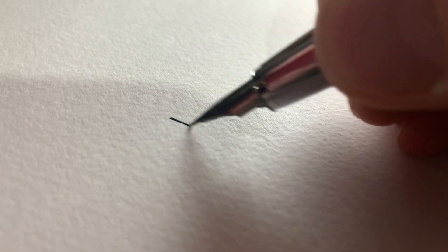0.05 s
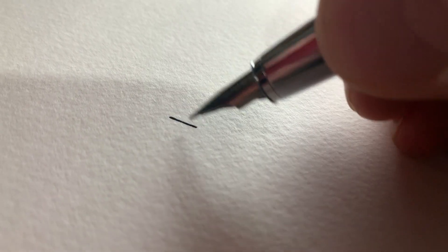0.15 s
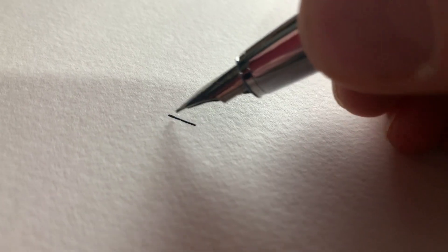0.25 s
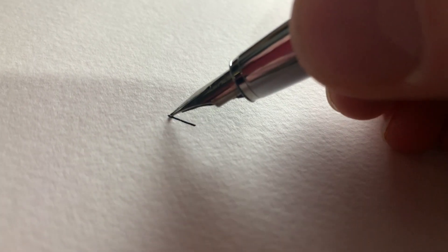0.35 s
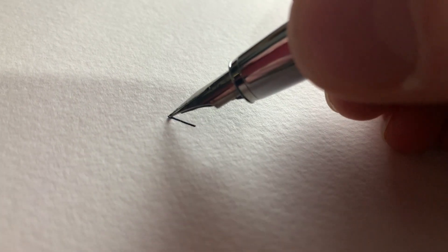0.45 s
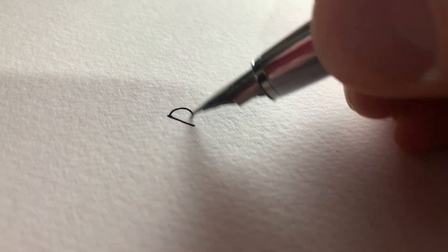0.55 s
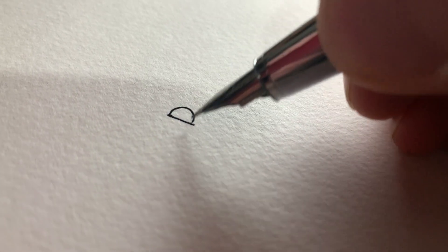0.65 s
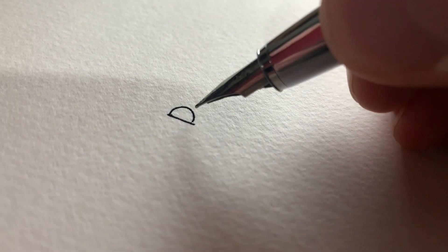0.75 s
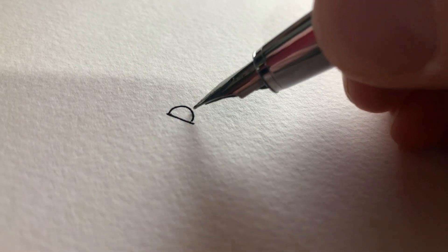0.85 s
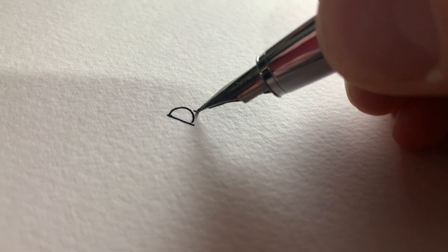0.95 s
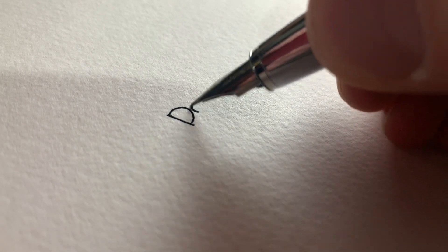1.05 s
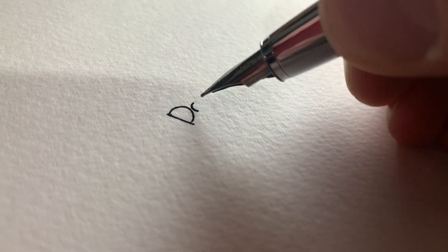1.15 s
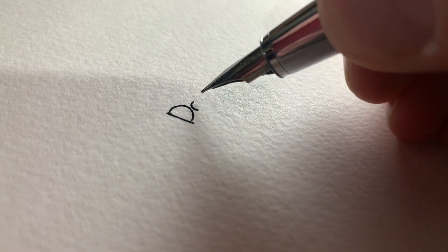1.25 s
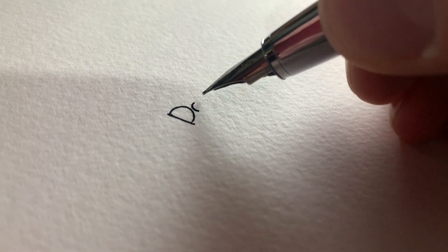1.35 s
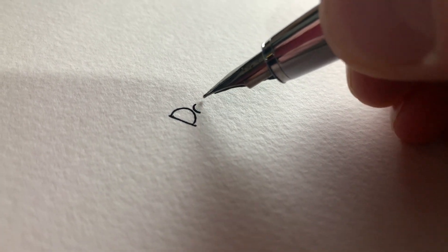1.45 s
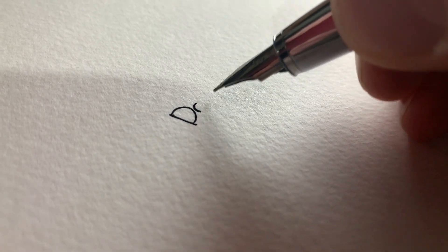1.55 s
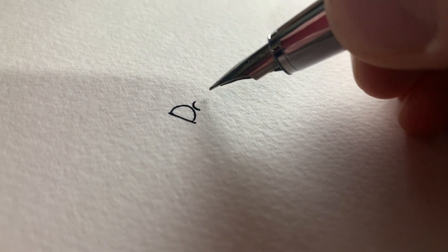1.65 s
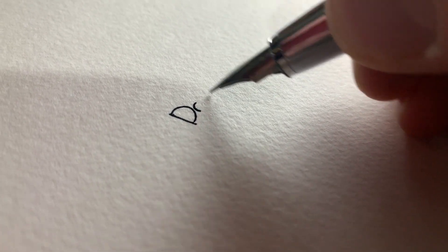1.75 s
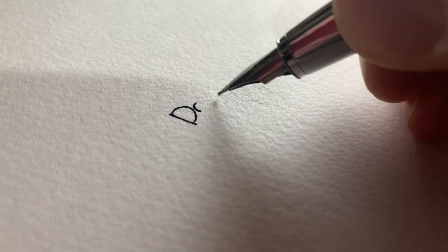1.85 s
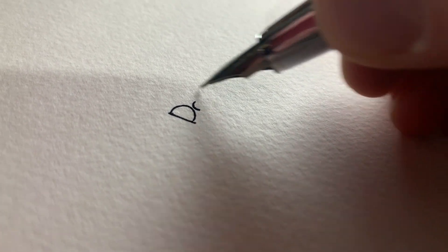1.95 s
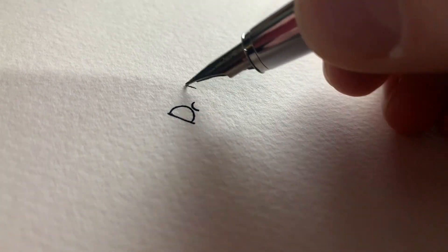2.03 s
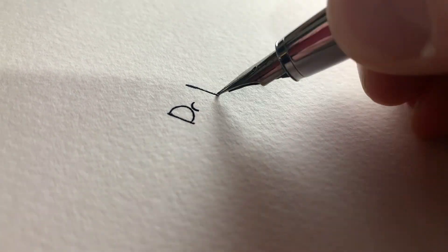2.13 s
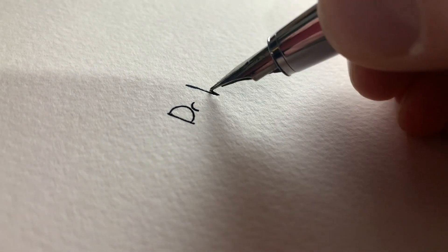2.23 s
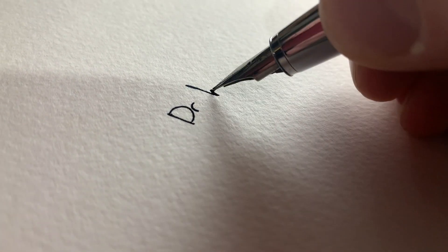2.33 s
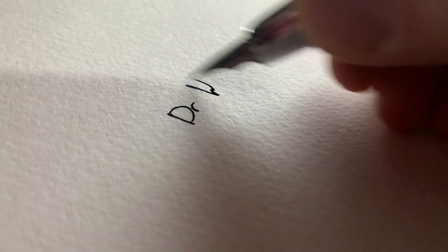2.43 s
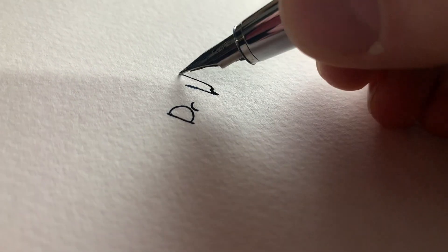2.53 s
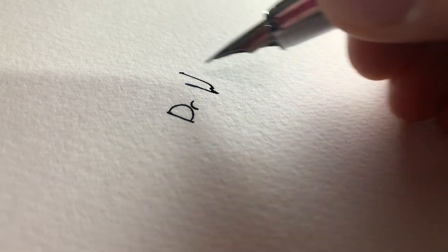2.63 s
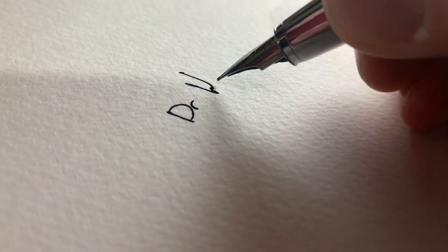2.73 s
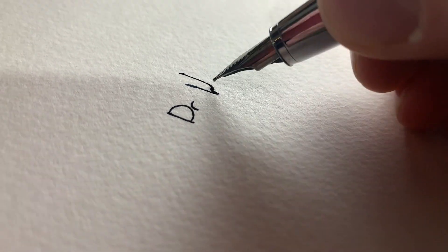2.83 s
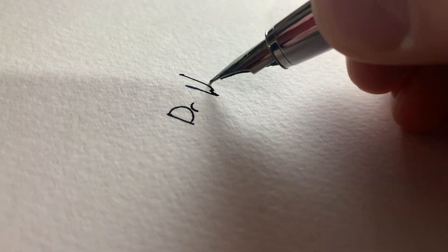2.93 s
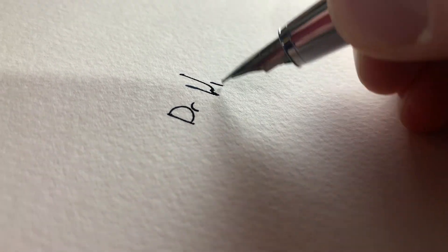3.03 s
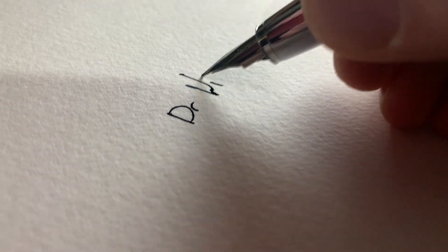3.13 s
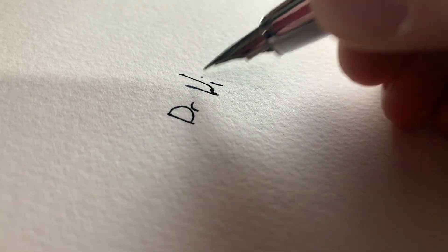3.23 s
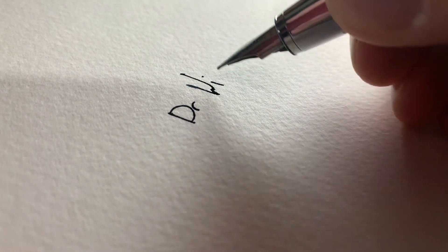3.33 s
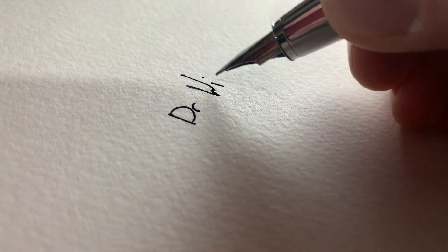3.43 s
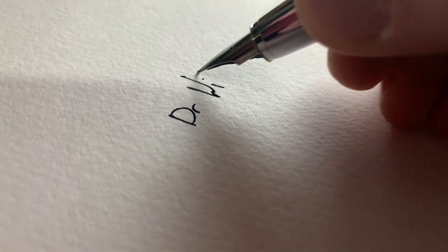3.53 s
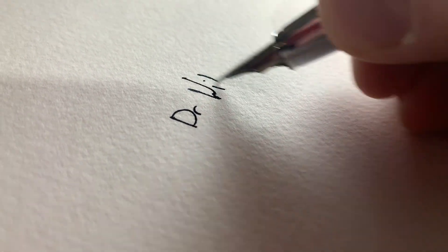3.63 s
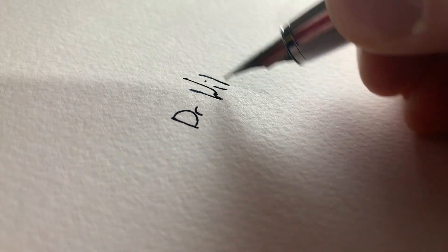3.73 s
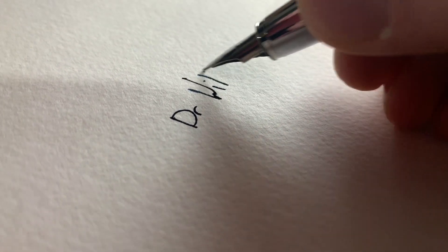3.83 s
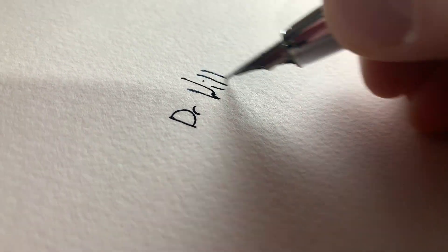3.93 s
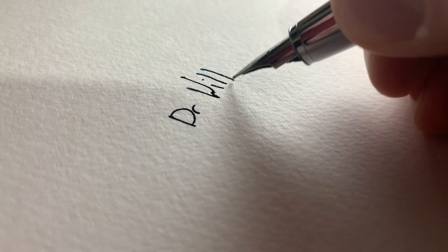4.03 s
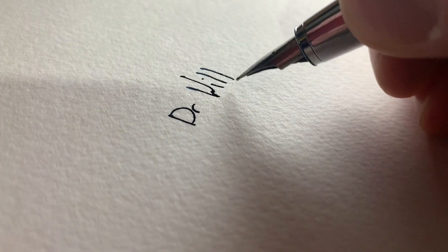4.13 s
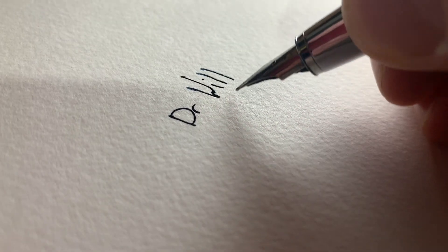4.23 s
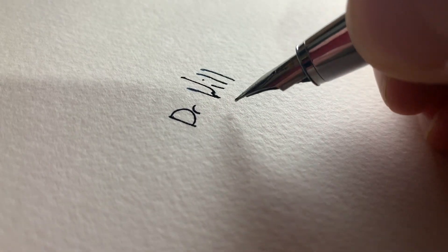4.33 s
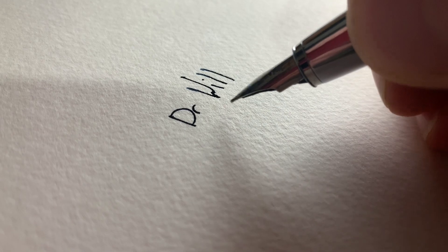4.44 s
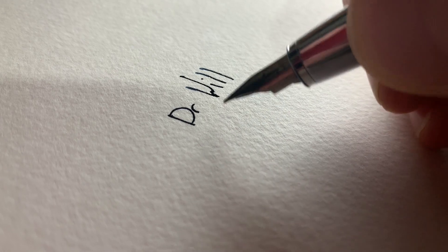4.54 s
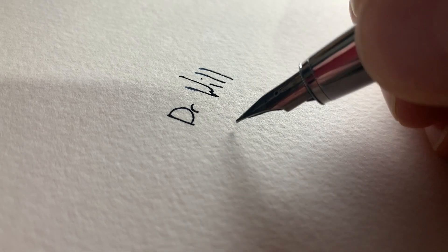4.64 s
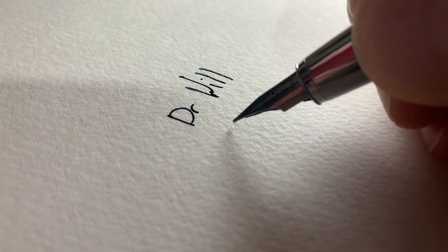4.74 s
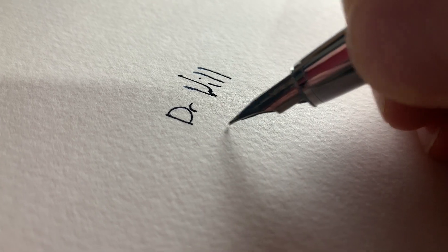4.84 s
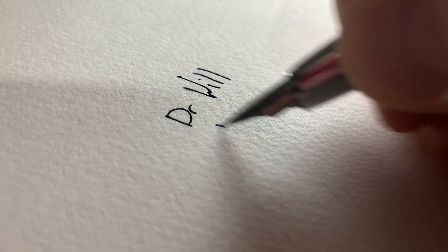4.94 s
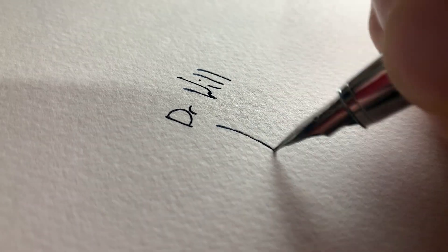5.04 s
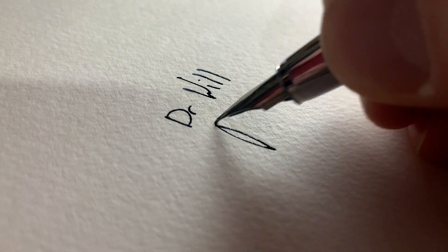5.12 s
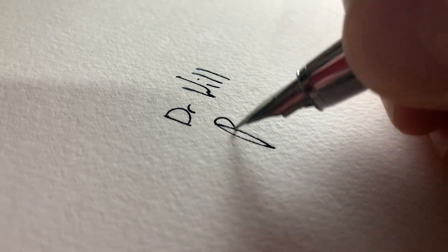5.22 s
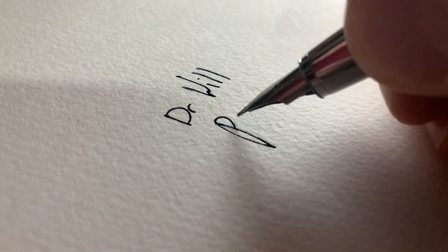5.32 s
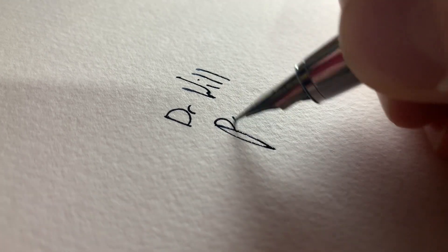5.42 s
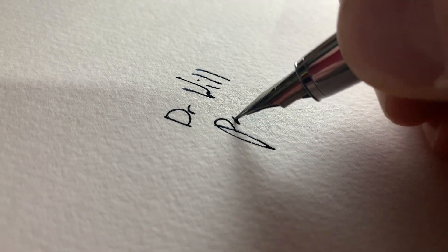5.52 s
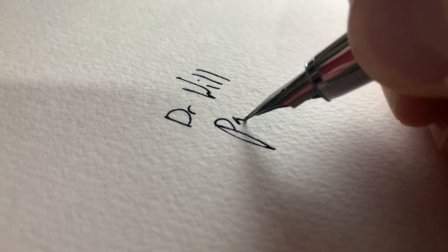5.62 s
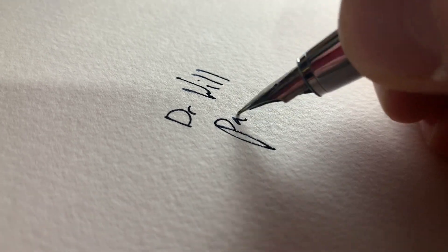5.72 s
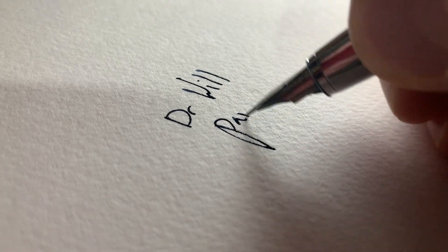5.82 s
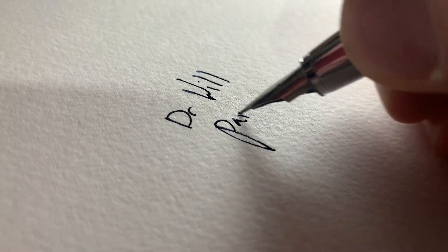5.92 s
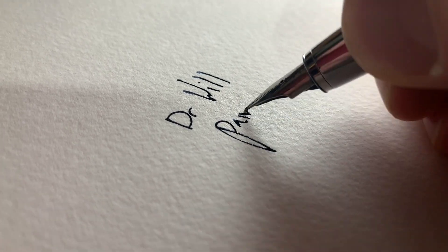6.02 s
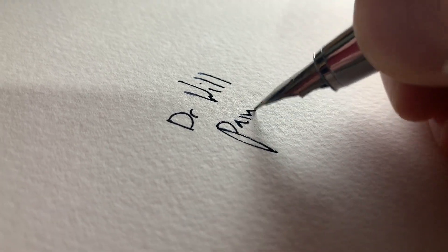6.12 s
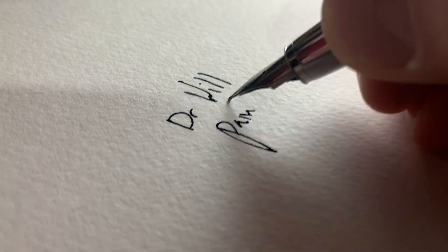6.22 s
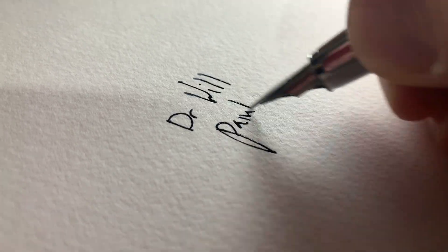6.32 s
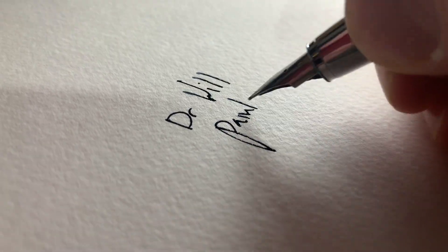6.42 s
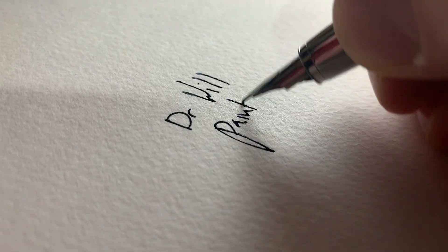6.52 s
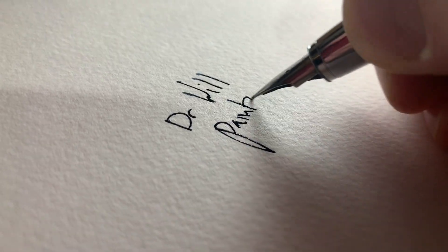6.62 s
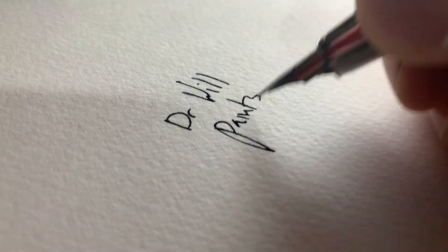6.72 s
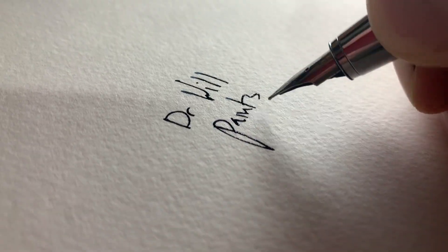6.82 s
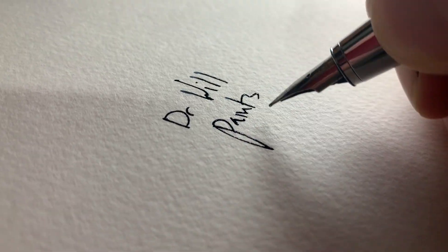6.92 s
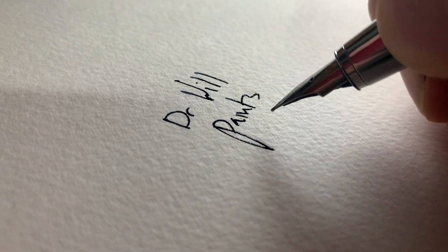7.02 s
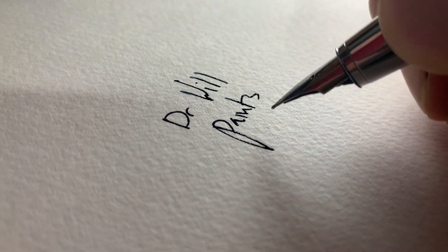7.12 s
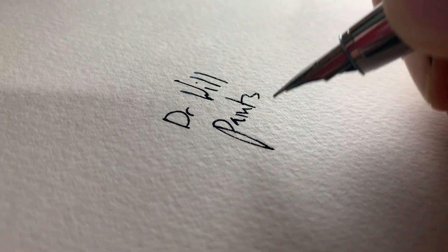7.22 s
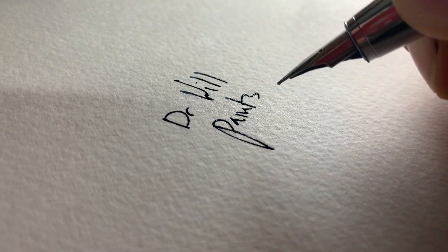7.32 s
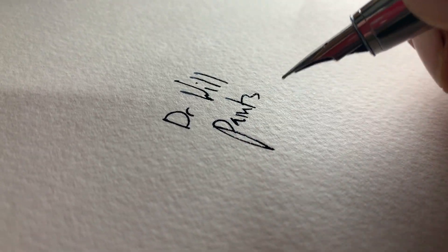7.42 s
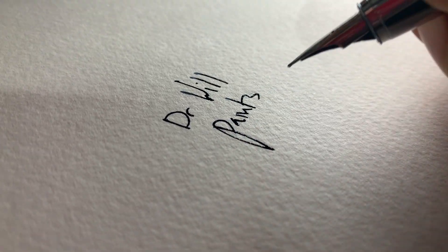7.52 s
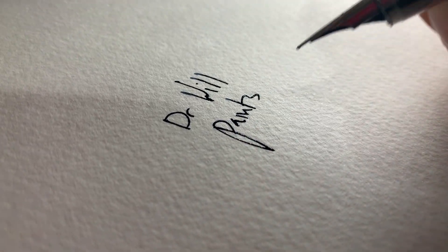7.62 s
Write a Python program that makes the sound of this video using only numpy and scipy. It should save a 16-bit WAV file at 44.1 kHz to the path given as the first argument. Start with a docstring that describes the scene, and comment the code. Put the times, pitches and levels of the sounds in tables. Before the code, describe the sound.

A few words are written with a metal nib, heard close and centred. Each stroke is a brief dry rasp, under a fifth of a second, with a hollow low thump from the desk top. Sharp little taps, soft finger bumps and barely audible skin rustles fall between. Sparse at first, the strokes crowd together after a pause. The room is small and furnished, with a short tail and quiet air noise.

```python
"""Fountain pen on textured paper

A pen writes a few words, close up in a quiet room. In each stroke random slips of the steel nib over the
fibres are filtered into scratch, while the same force drives the desk top modes as a drumming.
Nib contacts add clicks, thuds and a low knock; faint ticks, soft finger bumps and brushing slides of the
hand are scattered around them. Decaying noise makes the short room tail, over rumble, air, hum and whine."""
import sys
import numpy as np
from scipy import signal
from scipy.fft import rfft, irfft
from scipy.io import wavfile
from scipy.ndimage import uniform_filter1d, map_coordinates

SR = 44100
rng = np.random.default_rng(int(sys.argv[2]) if len(sys.argv) > 2 else 0)


def waveform_to_disk(signal):
    """Save audio, clipped to [-1, 1], as 16-bit WAV at the path in sys.argv[1]."""
    frames = np.transpose(np.atleast_2d(signal))
    scaled = np.clip(frames, -1, 1) * 32767
    samples = np.round(scaled).astype(np.int16)
    wavfile.write(sys.argv[1], SR, samples)


N = 338060
TIME = np.arange(N) / SR
FREQ = np.maximum(np.fft.rfftfreq(N, 1 / SR), 1)

# nib strokes: (time [s], nominal length [s], relative scratch level [dB],
#   pull [-1 pushed away .. 1 drawn toward the hand], edge [about -1 nib flat .. 1 on its edge])
NIB_STROKES = [(0.351, 0.082, -50, 0.73, 0.18), (0.83, 0.043, -43.5, -0.32, -0.235),
               (0.856, 0.091, -50, 0.13, -.1), (1.356, 0.092, -54, 0.51, -0.089),
               (2.319, 0.055, -58, -0.38, 0.45), (2.384, 0.092, -47.5, 0.61, -0.12),
               (2.515, 0.0432, -47, -0.28, -0.5), (2.733, 0.08, -41.5, -0.33, -0.44),
               (3.283, 0.086, -54.5, -0.92, 0.3), (3.869, 0.041, -66.5, 0.79, 0.26),
               (3.918, 0.11, -49, 0.28, -0.0042), (4.165, 0.0463, -60, -0.75, 0.49),
               (4.213, 0.11, -47, 0.47, -0.015), (5.194, 0.0694, -58.5, -0.56, 0.1),
               (5.264, 0.099, -42, 0.34, 0.018), (5.39, 0.073, -37.5, -0.75, -0.22),
               (5.453, .1, -47, -0.32, -0.24), (5.76, 0.058, -56.5, -0.25, -0.017),
               (5.848, 0.0487, -57.5, 0.17, -0.67), (5.913, 0.089, -56.5, -0.31, 1),
               (6.071, 0.12, -60.5, -0.39, 0.59), (6.259, 0.08, -54.5, -0.38, 1),
               (6.348, 0.043, -53.5, -0.19, -0.55), (6.407, 0.09, -61.5, -0.22, 0.26),
               (6.606, 0.12, -49.5, 0.183, 0.18), (6.863, .075, -49.5, 0.081, 0.033),
               (6.915, 0.0915, -58, -0.25, -0.69), (6.982, 0.0489, -44.5, -0.84, -0.61),
               (7.012, 0.057, -55.5, 0.64, -1.2)]
# the hand slides on the sheet: (time [s], nominal length [s], level [dB])
HAND_SLIDES = [(0.229, 0.091, -71), (0.486, 0.0504, -70.5), (1.261, 0.058, -70), (1.581, .085, -63.5),
               (1.86, 0.0893, -67.5), (2.092, 0.0692, -66.5), (2.575, 0.044, -64), (2.926, 0.1, -64),
               (3.351, 0.13, -74), (4.604, 0.072, -74.5), (4.886, 0.087, -69), (5.981, 0.093, -70.5),
               (6.501, 0.195, -69.5), (7.078, 0.11, -75)]
# nib contacts, landings and two loud ticks of the lifted pen (at 2.467 and 7.055 s):
#   (time [s], relative level [dB], hardness [0..1])
NIB_CONTACTS = [(0.681, -52, 0.3), (0.8155, -40.5, 0.45), (1.226, -47.5, 0.22), (2.329, -44, 1),
                (2.467, -37.5, 0), (3.246, -49, 0.79), (3.48, -36, 0.74), (3.876, -38, 0.9),
                (4.178, -34, 1), (5.2027, -41, 0.91), (5.718, -45, .7), (6.049, -40, 0.48),
                (6.232, -43.5, 0.12), (6.3452, -54, 0.59), (6.5788, -34.5, 0.75), (7.055, -39, 0.78)]
# faint dry ticks of the lifted pen: (time [s])
TICK_TIMES = [0.262, 0.539, 1.093, 1.92, 2.192, 3.019, 3.579, 3.852, 4.125, 4.401, 4.678, 4.959, 7.156,
              7.432]
# fingers bump the desk softly: (time [s], desk level before softening [dB])
FINGER_BUMPS = [(0.255, -59), (1.442, -36), (1.481, -45), (2.924, -47.5), (3.295, -54), (5.549, -39),
                (6.305, -33), (6.83, -38), (7.316, -56.5)]
# resonances of the desk top: (frequency [Hz], width [Hz], relative level [dB])
DESK_MODES = [(64.4, 45, -13.5), (197.9, 11, -3.5), (229.7, 28.6, 4), (391, 22, -25), (427, 50, -27.5),
              (506.6, 18.6, -21.5), (558, 28.2, -18), (733, 72, -19.5), (967, 101, -25)]
# colour of the scratch on paper: (frequency [Hz], relative level [dB])
PAPER_COLOUR = [(350.0, -9), (650.0, -5.5), (1050.0, -7), (1400.0, -5), (2100.0, -1), (3400.0, -3),
                (4300.0, -1), (5500.0, -5.0), (7000.0, -7.5), (8400.0, -4.5), (9200.0, -13.5),
                (9800.0, -21.5), (10700.0, -11.5), (11700.0, -20)]
# colour of skin brushing the sheet: (frequency [Hz], relative level [dB])
SKIN_COLOUR = [(700, -12), (1600, -10), (2300, -3.5), (4000, -2.5), (4700, -7), (6300, -0.5), (8200, -10),
               (9800, -16.5), (11500, -31)]
# colour of a hard contact with ringing tines: (frequency [Hz], relative level [dB])
HARD_TAP_COLOUR = [(500, -9), (900, -16.5), (1300, 3), (1700, -6), (2150, 17), (2450, -3.5), (2850, 14),
                   (3500, -13.5), (4200, 14.5), (5300, 13), (5800, -5.5), (6500, 13.5), (9500, -50),
                   (11000, -15)]
# colour of a tick or soft contact: (frequency [Hz], relative level [dB])
DULL_TICK_COLOUR = [(300, -3), (900, -8), (1500, -1.5), (2200, -9), (3000, -12.5), (5200, -14), (8000, -24),
                    (11500, -19.5)]
# colour of the air noise: (frequency [Hz], relative level [dB])
AIR_COLOUR = [(12, -5), (22, 4), (38, -8), (50, -5.5), (85, -21), (200, -20.5), (500, -30.5), (1500, -38.5),
              (4000, -43), (11500, -48), (15000, -102)]
# mains hum and a thin electronic whine: (frequency [Hz], rms level [dB])
HUM_LINES = [(50, -71), (3000, -92.5), (4000, -99), (5001, -101), (7000, -102)]

RISE_SHARE = 0.5  # share of a movement's nominal length spent speeding up
RUN_OUT = 1.33  # how quickly a movement coasts to rest
DESK_DB, DESK_PULL_DB = -0.2, 11.5  # desk drum over the listed scratch level, and its gain at full pull
BODY_PULL_DB = 8.5  # gain of the low body of the scratch at full pull
FIRM_DB, FIRM_BODY = -38.5, 1.1  # desk level above which a stroke gains body, dB of body per dB
TILT_DB, TILT_EDGE_DB = 1, 4  # brightness per octave above 2 kHz, and its gain on the edge
NIB_DB, NIB_EDGE_DB, NIB_PULL_DB = 2.5, 16.5, 7  # tine resonance, its gain on the edge and at full pull
FIZZ_HZ, FIZZ_EDGE_DB, FIZZ_PULL_DB = 9690, -4.5, 4.5  # finest fizz: start, gain on the edge and at full pull
ECHO_EDGE, ECHO_LAG_MS = 0.57, 0.219  # near reflection: strength on the edge, delay
HARD_THUD_DB = -14  # change of the thud for a fully hard contact
KNOCK_HZ, KNOCK_S, KNOCK_PEAK_DB = 84, 0.016, -55.5206  # low desk knock: pitch, decay, envelope peak
AIR_DB = -64  # rms level of the air noise
TOP_HZ = 12000  # top of the recorded band


def strokes(scratch_db=1, lead_s=0.005016, body_hz=930, dig=1.13):
    """Friction at the nib radiates from the sheet and shakes the desk under it."""
    out = np.zeros(N)
    for s, length_s, db, pull, edge in NIB_STROKES:
        pace = speed(length_s)
        desk_db = drum_db(db, pull)
        # pulled and firm strokes press the sheet flat on the desk and gain low body
        body_db = BODY_PULL_DB * pull + FIRM_BODY * max(desk_db - FIRM_DB, 0)
        body = undb(body_db / (1 + (bins() / body_hz) ** 4))
        colour = nib_colour(pull, edge) * body
        force = fibres(pace, per_s=20000, spread_db=4.0, bump_db=1.5, bump_hz=256.2, catch_db=0.5)
        # the nib travels from one spot of the sheet to the next, so the colour shifts
        travel = np.linspace(0, np.pi / 2, len(pace))
        for share in (np.cos(travel) ** 2, np.sin(travel) ** 2):
            spot = response(colour * sheet_modes(4.6))
            scratch = signal.fftconvolve(force * share, spot)
            add(out, s, undb(db + scratch_db) * scratch)
        # the desk drum builds up slowly, so its push starts a little early; it is hardest in mid stroke
        add(out, s - lead_s, undb(desk_db) * desk(force * pace ** dig))
    return out


def speed(length_s):
    """A movement of the fingers speeds up briskly, slows down and coasts softly to rest."""
    rise = np.sin(np.linspace(0, np.pi / 2, int(RISE_SHARE * length_s * SR)))
    slowing = np.arange(0, 2, 1 / ((1 - RISE_SHARE) * length_s * SR))
    return np.concatenate([rise, np.exp(-(RUN_OUT * slowing) ** 2)])


def fibres(pace, per_s, spread_db, bump_db, bump_hz, catch_db, catch_hz=70, swell=0.7):
    """Tiny slips over fibres, denser when faster, swelling with the bumps of the paper and uneven grip."""
    n = len(pace)
    t = np.arange(n) / SR
    happens = rng.random(n) < pace * per_s / SR
    direction = rng.choice([-1, 1], n)
    slips = happens * direction * undb(spread_db * rng.standard_normal(n))
    grip_db = bump_db * wander(t * bump_hz) + catch_db * wander(t * catch_hz)
    return unit(slips * pace ** swell * undb(grip_db)) * np.sqrt(np.mean(pace ** 2))


def nib_colour(pull, edge, nib_hz=2330, nib_width_hz=430, low_hz=300):
    """The pose of the pen sets the brightness, tine resonance, fizz and notches of the scratch."""
    f = bins()
    paper = spectrum(PAPER_COLOUR, f) / (1 + (low_hz / f) ** 4)
    # on its edge the nib sounds brighter; on its edge or pulled, its tines resonate
    tilt_db = (TILT_DB + TILT_EDGE_DB * edge) * np.log2(np.maximum(f, 2000) / 4000)
    nib_db = NIB_DB + NIB_EDGE_DB * edge + NIB_PULL_DB * pull
    nib = undb(tilt_db + nib_db * np.exp(-((f - nib_hz) / nib_width_hz) ** 2))
    # a flat, pulled nib fizzes most at the very top
    fizz_db = FIZZ_EDGE_DB * edge + FIZZ_PULL_DB * pull
    fizz = undb(fizz_db / (1 + (FIZZ_HZ / f) ** 20))
    # a near reflection cuts notches that change with the pose
    notches = np.abs(1 + ECHO_EDGE * edge * np.exp(-2j * np.pi * f * ECHO_LAG_MS / 1000))
    return paper * nib * fizz * notches


def sheet_modes(depth_db, spacing_hz=230):
    """Every spot on the sheet excites its own chance set of peaks and dips."""
    return undb(depth_db * wander(bins() / spacing_hz))


def drum_db(scratch_db, pull):
    """A pulled nib digs in and shakes the desk more than a pushed one."""
    return scratch_db + DESK_DB + DESK_PULL_DB * pull


def desk(force, size=11025):
    """The desk top builds up and rings in its modes, with as much energy as rms 1 over the push."""
    t = np.arange(size) / SR
    out = 0
    for hz, width, db in DESK_MODES:
        mode = t * np.exp(-np.pi * width * t) * np.sin(2 * np.pi * hz * t)
        out = out + undb(db) * unit(signal.fftconvolve(force, mode))
    return out * np.sqrt(len(force)) / np.linalg.norm(out)


def taps(tap_db=-1, thud_db=2, push_s=0.003549, settle_s=0.00297, tick_db=-46, flesh_hz=215):
    """Each nib contact clicks, then thuds and knocks in the desk; faint ticks and bumps are mixed in."""
    out = np.zeros(N)
    push = np.hanning(int(push_s * SR) + 3)
    bright, dull = spectrum(HARD_TAP_COLOUR, bins()), spectrum(DULL_TICK_COLOUR, bins())
    for s, db, hardness in NIB_CONTACTS:
        # a harder contact rings the steel tines more and thuds less
        ring = np.clip(hardness, 0, 1)
        colour = bright ** ring * dull ** (1 - ring)
        add(out, s + 0.0012, undb(db + tap_db) * click(colour, chatter=0.043, chatter_s=0.0052))
        add(out, s + settle_s, undb(db + thud_db + HARD_THUD_DB * ring) * desk(push))
        add(out, s, knock())
    for s in TICK_TIMES:
        add(out, s + .001, undb(tick_db) * click(dull, chatter=0.11, chatter_s=0.00072))
    # a fingertip is too soft to reach the upper modes of the desk
    cushion = signal.butter(3, flesh_hz, fs=SR, output="sos")
    cushioned = signal.sosfilt(cushion, desk(push))
    for s, desk_db in FINGER_BUMPS:
        add(out, s, undb(desk_db) * cushioned)
        add(out, s, knock())
    return out


def click(colour, chatter, chatter_s, size=900):
    """One contact with a brief chatter after it, peak 1."""
    force = chatter * rng.standard_normal(size) * np.exp(-np.arange(size) / SR / chatter_s)
    force[0] += 1
    sound = signal.fftconvolve(force, response(colour * sheet_modes(1.04, spacing_hz=699)))
    return sound / np.abs(sound).max()


def knock(size=8000):
    """The whole desk gives under a nib contact or finger and swings back a few times."""
    t = np.arange(size) / SR
    swell = t / KNOCK_S * np.exp(1 - t / KNOCK_S)
    return undb(KNOCK_PEAK_DB) * np.sin(2 * np.pi * KNOCK_HZ * t) * swell


def slides():
    """Skin brushes the sheet as the hand moves on."""
    out, skin = np.zeros(N), spectrum(SKIN_COLOUR, bins())
    for s, length_s, db in HAND_SLIDES:
        force = fibres(speed(length_s), per_s=32000, spread_db=6.0, bump_db=0.0, bump_hz=147,
                       catch_db=3.5, swell=0.637)
        brush = signal.fftconvolve(force, response(skin * sheet_modes(1.33)))
        add(out, s, undb(db) * brush)
    return out


def hand_rumble(rumble_db=-58.0, follow=0.052, hold_s=.7):
    """The working hand rocks the desk: low noise swells with the strokes, a little more for firm ones."""
    effort = np.zeros(N)
    for s, length_s, db, pull, _ in NIB_STROKES:
        add(effort, s, undb(follow * drum_db(db, pull)) * speed(length_s))
    effort = uniform_filter1d(effort, int(hold_s * SR))
    shake = noise([(15, -17.5), (28, 9.0), (42, -14.0), (65, 1.5), (100, -17), (150, -13.5),
                   (400, -86), (2000, -85)])
    return undb(rumble_db) * effort / effort.max() * shake


def room_tail(x, t60_s=0.4, wet_db=-20, bass_t60_s=0.33, bass_wet_db=-10, split_hz=330,
              gap_s=0.0032, size=30000):
    """Diffuse reflections of a small furnished room, with an extra, stronger return of the bass."""
    t = np.arange(size) / SR
    bass = signal.sosfilt(signal.butter(4, split_hz, fs=SR, output="sos"), x)
    out = 0
    for part, decay_s, db in ((x, t60_s, wet_db), (bass, bass_t60_s, bass_wet_db)):
        h = rng.standard_normal(size) * undb(-60 * t / decay_s) * (t > gap_s)
        out = out + undb(db) * signal.fftconvolve(part, h / np.linalg.norm(h))[:N]
    return out


def room_floor():
    """Faint shaped air noise under steady sine tones of hum and whine."""
    lines = np.zeros(N)
    for hz, db in HUM_LINES:
        lines += undb(db) * np.sqrt(2) * np.sin(2 * np.pi * (hz * TIME + rng.random()))
    return undb(AIR_DB) * noise(AIR_COLOUR) + lines


def noise(points):
    """Steady noise of a given spectrum, rms 1."""
    return unit(irfft(rfft(rng.standard_normal(N)) * spectrum(points, FREQ), N))


def wander(x):
    """A smooth random curve of spread near 1 that heads for a new value with each unit of x."""
    values = rng.standard_normal(int(x[-1]) + 3)
    return map_coordinates(values, [x + rng.random()], order=3, mode="mirror")


def response(gain):
    """Causal minimum-phase impulse response in the shape of the given gains, scaled to unit energy."""
    cepstrum = irfft(np.log(gain + 1e-6))
    half = len(cepstrum) // 2
    # fold the mirrored half forward so that the sound starts at once
    cepstrum[1:half] *= 2
    cepstrum[half + 1:] = 0
    h = irfft(np.exp(rfft(cepstrum)))
    return h / np.linalg.norm(h)


def spectrum(points, f):
    """Gain at frequencies f of a list of (frequency [Hz], level [dB]) points."""
    hz, db = np.transpose(points)
    return undb(np.interp(np.log(f), np.log(hz), db))


def bins(size=1024):
    """Frequencies on which short responses are drawn."""
    return np.maximum(np.fft.rfftfreq(size, 1 / SR), 1)


def undb(db):
    """Decibels to gain."""
    return 10 ** (np.asarray(db) / 20)


def unit(x):
    """Scale to rms 1."""
    return x / np.sqrt(np.mean(x ** 2) + 1e-30)


def add(track, s, sound):
    """Mix a sound into the track from time s on."""
    i = max(int(s * SR), 0)
    track[i:i + len(sound)] += sound[:max(N - i, 0)]


def scene():
    """Pen, hand and room, heard alike in both channels."""
    writing = strokes() + slides() + taps()
    mono = writing + room_tail(writing) + hand_rumble() + room_floor()
    return np.array([mono, mono])


def record(dry):
    """A steep elliptic low-pass removes the top, as a phone does."""
    return signal.sosfilt(signal.ellip(10, .2, 70, TOP_HZ, fs=SR, output="sos"), dry)


dry = scene()
out = record(dry)
waveform_to_disk(out)
```